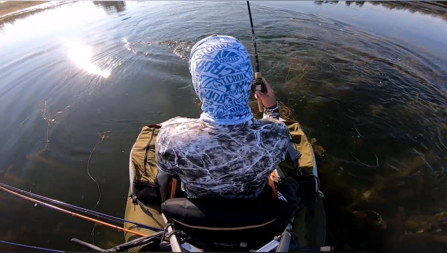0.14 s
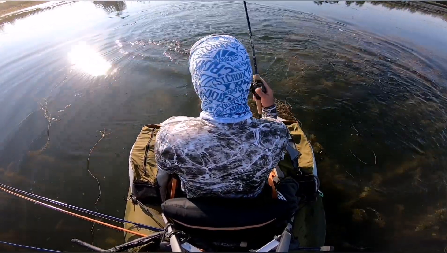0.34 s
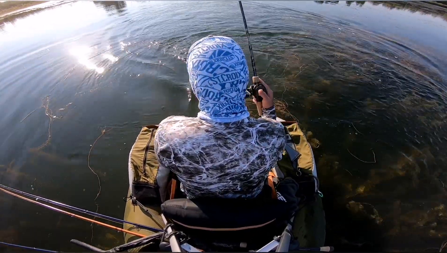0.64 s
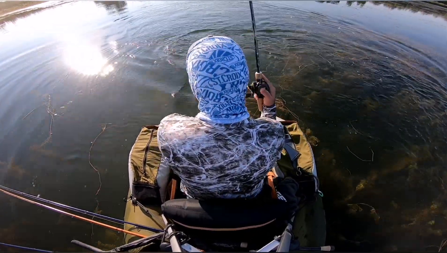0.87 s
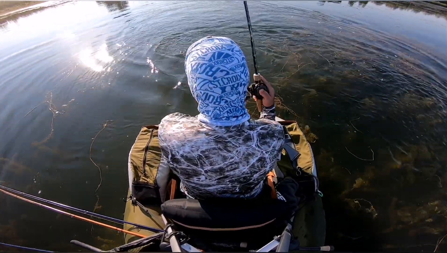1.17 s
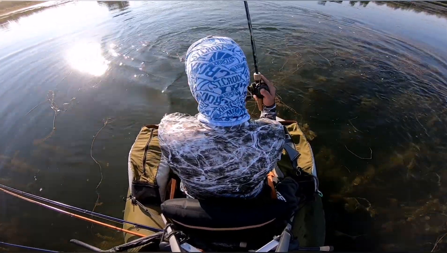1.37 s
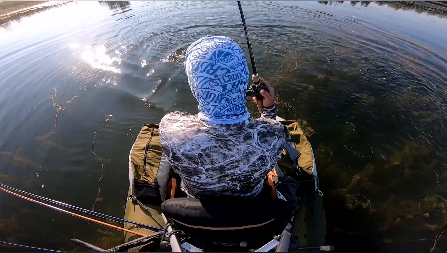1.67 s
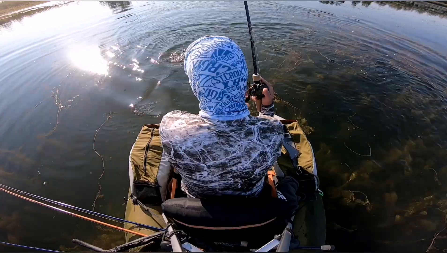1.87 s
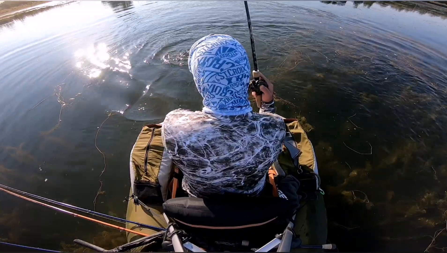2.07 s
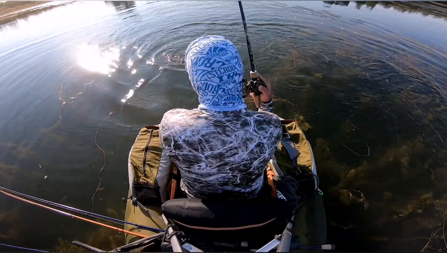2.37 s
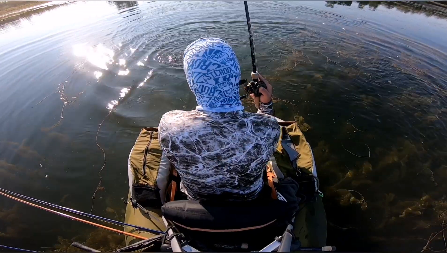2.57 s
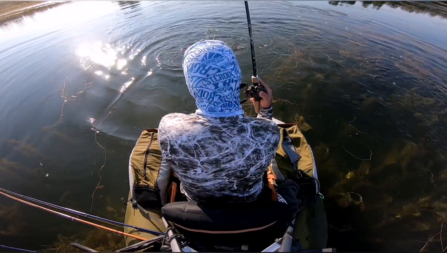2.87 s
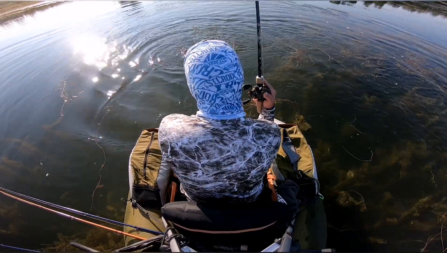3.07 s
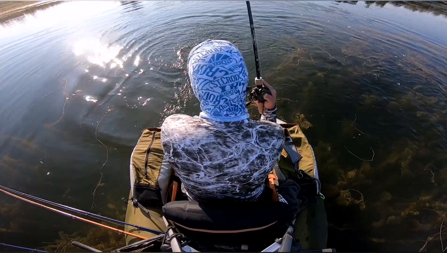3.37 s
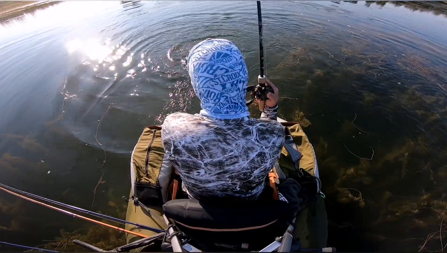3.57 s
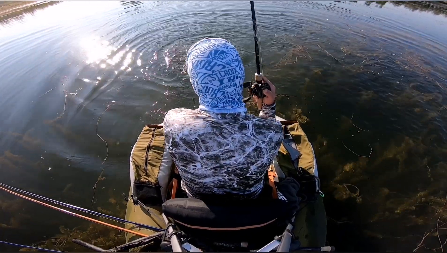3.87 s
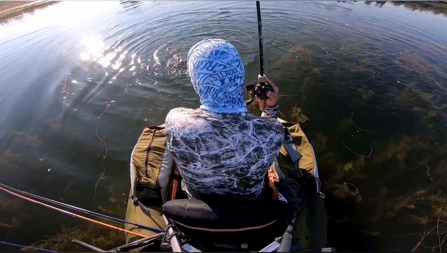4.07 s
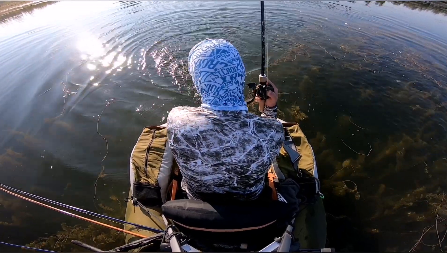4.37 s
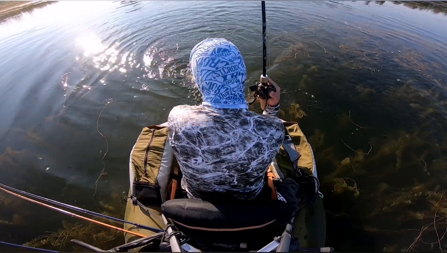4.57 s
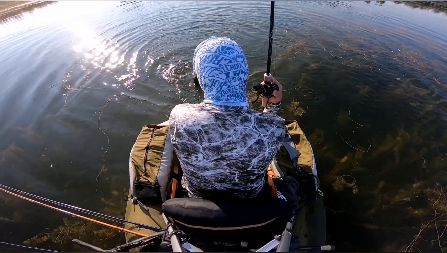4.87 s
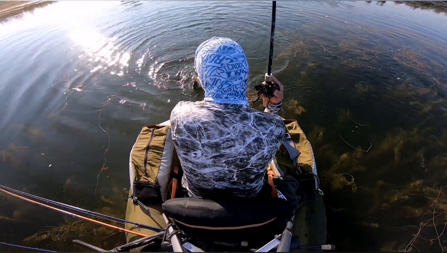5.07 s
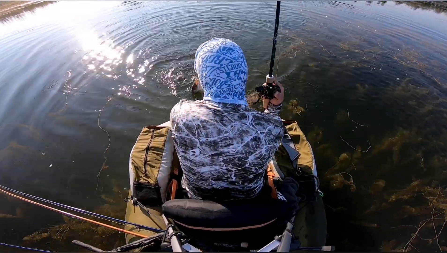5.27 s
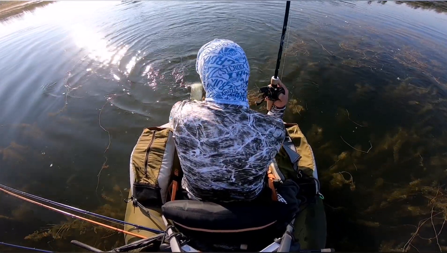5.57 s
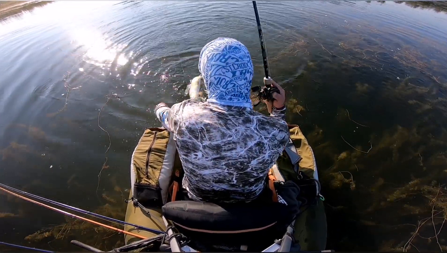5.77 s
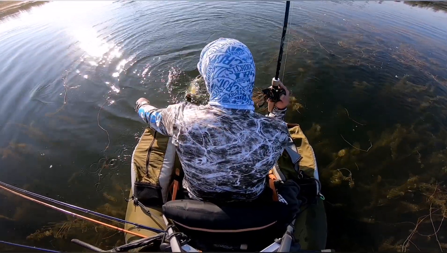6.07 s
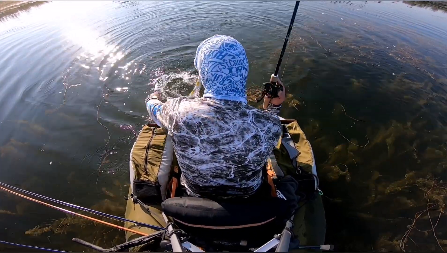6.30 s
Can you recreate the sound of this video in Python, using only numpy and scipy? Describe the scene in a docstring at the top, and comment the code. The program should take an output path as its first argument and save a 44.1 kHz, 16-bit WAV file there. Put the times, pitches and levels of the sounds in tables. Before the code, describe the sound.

Light wind rumbles and thumps on the microphone over a pond while a fish splashes beside a float tube, slightly left of centre. Short bouts of sloshing and spray follow one another, with droplets, bubbles and trickling between them. One sharp click of gear cuts in. Later the water settles for a moment, the tube gives a few soft creaks, and the fish starts thrashing again.

```python
"""A hooked fish thrashes at the surface of a pond, a little left of a float tube, while light wind buffets
two microphone ports. From the first instant water sloshes, churns and sprays; drops slap back, trapped
bubbles ring and shrinking hollows swish upward. Near 1.5 s a fitting clicks, and the bouts of thrashing
go on. In a lull at 5 s the tube's skin creaks; from 5.5 s the fish thrashes again to the end."""
import sys
import numpy as np
from scipy.fft import rfft, irfft, next_fast_len
from scipy.io import wavfile
from scipy.ndimage import uniform_filter1d, map_coordinates

SR = 44100
rng = np.random.default_rng(int(sys.argv[2]) if len(sys.argv) > 2 else 0)


def generate_wav(signal):
    """Clip the signal to [-1, 1] and save it as 16-bit WAV at the path in sys.argv[1]."""
    frames = np.transpose(np.atleast_2d(signal))
    scaled = np.clip(frames, -1, 1) * 32767
    pcm = np.round(scaled).astype(np.int16)
    wavfile.write(sys.argv[1], SR, pcm)


N = 284004

# Thrashes of the fish; rise and fall each span 20 dB of churn:
# peak_s, rise_s, fall_s, churn_db, slosh_over_churn_db, spray_over_churn_db, mist_over_spray_db
THRASHES = [ (.008, 0.047, 0.072, -41.5, -3.5, -9, -4.5), (.076, 0.11, 0.037, -48, -8, -3, -8),
            (0.109, 0.024, 0.11, -40, -14, -2.5, -1), (.35, 0.16, 0.25, -55.5, -16, -2.5, -8.5),
            (.52, 0.16, 0.11, -59, -14, -5.5, -19), (.66, 0.033, 0.18, -62.5, -16, 12, -2.5),
            (.718, 0.12, 0.023, -64, -12, 15.5, -2.5), (.85, 0.029, 0.12, -61.5, -11, 17.5, -6.5),
            (.894, 0.034, 0.016, -51, 3, 7, -10), (.95, 0.1, 0.19, -49.5, -5, -3.5, -7),
            (1.017, 0.086, 0.088, -45.5, 13, -1, -13), (1.053, 0.069, 0.052, -36.5, 0.5, -1.5, -17),
            (1.079, 0.11, 0.19, -45.5, -5.5, -1, -9.5), (1.19, 0.21, 0.25, -53.5, -5, -27, -11),
            (1.303, 0.054, 0.082, -46, -26, 4.5, -10), (1.53, 0.026, 0.15, -59, -4, 6, -5),
            (1.585, 0.061, 0.16, -43, -6.5, -2.5, -16), (1.71, 0.25, 0.15, -52, -11, 2, -30),
            (1.83, 0.099, 0.081, -56, -14.5, -21, -14), (1.92, 0.12, 0.38, -56.5, -24, -7.5, -9),
            (2.115, 0.029, 0.22, -58.5, -4, -4, 1), (2.205, 0.019, 0.063, -45.5, 0, -6.5, -10),
            (2.5, 0.023, 0.031, -56, -11, -6.5, -1.5), (2.614, 0.059, 0.14, -37, -16, -3, 0.5),
            (2.658, 0.094, 0.037, -35.5, 1.6, -11, -9), (2.735, 0.073, 0.072, -42.5, 5, -1.5, -8.5),
            (2.87, 0.14, 0.1, -49.5, -20, -4, -8), (2.971, 0.027, 0.11, -41, -5, -2.5, -0.5),
            (3.047, 0.05, 0.046, -44.5, 4, 3.5, 4), (3.064, 0.047, 0.033, -36.5, -7, 1.3, -5),
            (3.085, 0.043, 0.32, -41.5, -9.5, -11, -4), (3.15, 0.077, 0.21, -47.5, -25, -0.5, -12),
            (3.25, 0.11, 0.25, -47.5, -18, -5, -9.5), (3.297, 0.011, 0.22, -41.5, -7.5, -8.5, -4),
            (3.632, 0.67, 0.01, -55.5, -10, -6.5, -4.5), (3.777, 0.054, 0.063, -41.5, -8.5, 0, -4.5),
            (3.814, 0.043, 0.092, -48.5, -10, -5, 8.5), (3.87, 0.13, .18, -52.5, -8, -5.5, -12),
            (3.99, 0.21, 0.072, -64, -1, 6, -18), (4.062, 0.036, 0.076, -63, -6, 10.5, -11),
            (4.118, 0.03, 0.14, -41.5, -20, -12, 4), (4.144, 0.041, 0.064, -35.5, -5.5, -0.5, -6),
            (4.2, 0.14, 0.35, -48, -12, 2, -21), (4.26, 0.033, 0.069, -36.5, -4, -0.5, -12),
            (4.289, .05, 0.36, -43.5, -4, -10.5, -5), (4.4, 0.25, 0.19, -49.5, -1.5, 1, -10.5),
            (4.489, 0.08, 0.18, -42.5, -14, -16, -6), (4.57, 0.17, 0.14, -49, -30, 1, -9),
            (4.772, 0.056, 0.074, -47.5, -33, -1.5, -24), (5.556, 0.023, 0.93, -41, -13, -3, -5.5),
            (5.628, 0.076, 0.031, -38.5, 7, -6.5, 3), (5.674, 0.082, 0.055, -44.5, 12, -17, -11),
            (5.74, 0.083, 0.14, -43, 6, -23, -7), (5.918, 0.048, 0.086, -53, 5.5, -10, -6),
            (5.984, 0.077, 0.067, -46.5, 4.5, -1.5, -2), (6.127, 0.15, 0.99, -44.5, -14, -1.5, -8.5),
            (6.253, 0.25, 0.084, -45.5, -3.5, -3.5, -14), (6.351, 0.052, 0.22, -43.5, -3, -3, -4),
            (6.415, 0.15, .2, -39, 3.5, -12, -3)]
# Water running off between thrashes: time_s, level_db
TRICKLE = [(0, -61), (.8, -68.5), (1.1, -79), (1.25, -56), (1.5, -55), (2.3, -72.5), (2.6, -59.5),
           (4.7, -60.5), (4.86, -67), (5.0, -72), (5.06, -70), (5.5, -87.5), (5.6, -56), (6.44, -45)]
# Layer trims on that run-off: slosh_db, churn_db, spray_db, mist_db
TRICKLE_MIX = [-11.5, -10.5, -10, -12]
# Tone of the splashing water: frequency_hz, gain_db
WATER_EQ = [(120, -39), (200, -5.5), (446, -8.5), (525, -4), (691, 1.5), (799, -0.5), (2610, 3.5),
            (3130, 0), (7120, -9.5), (8860, -18.5), (9530, -13.5), (12500, -28.5), (15600, -24)]
# How alike the froth is left and right: frequency_hz, correlation
WATER_CORRELATION = [(290, 1), (700, 0.73), (3100, 0.95), (6800, 0.48), (15000, .3)]
# Wind rumble between gusts: time_s, level_db
BREEZE = [(0, -53), (.25, -57), (.7, -59.5), (1.05, -52), (1.17, -62), (1.5, -51), (1.75, -54), (2.05, -46),
          (2.9, -45.5), (3.4, -47.5), (3.9, -49.5), (4.15, -45.5), (4.45, -58.5), (4.7, -57), (4.9, -46),
          (5.3, -51.5), (5.9, -47), (6.44, -42)]
# Tone of the buffeting rumble: frequency_hz, gain_db
RUMBLE_EQ = [(12, -26.5), (20, -6), (54, -3), (74, -4), (152, -14.5), (195, -24), (300, -55), (390, -75.5),
             (660, -120)]
# Tone of the steady air: frequency_hz, gain_db
AIR_EQ = [(59, -33), (100, -12.5), (197, -9.5), (412, -31), (542, -31.5), (844, -25), (2700, -43.5),
          (4980, -42.5), (9190, -53), (12300, -59), (15600, -72)]
# Gusts thumping the ports: peak_s, pitch_hz, level_db, left_minus_right_db
GUSTS = [(.11, 81, -26.5, -20), (.354, 86, -30.5, -15), (.526, 64, -38, -13), (1.284, 109, -36.5, 18),
         (1.602, 77.4, -32, -8), (1.876, 70, -25, 7.5), (1.947, 79, -31, 1), (2.133, 63, -30, 7),
         (2.332, 71, -26, -12), (2.439, 77, -27, -14), (2.549, 83, -34, -14), (5.069, 75, -24, -8),
         (2.833, 68.4, -27.5, -8), (2.943, 76, -23.5, -23), (3.015, 78, -32, -15), (3.299, 67, -28.5, -15),
         (3.816, 69, -34.5, -13), (4.059, 105, -28, -8), (4.116, 111, -32, -6), (4.842, 79.4, -28.5, -9),
         (4.933, 71, -32, -12), (4.984, 92, -32.5, -12), (5.04, 80, -21.5, -13), (5.76, 60, -29.5, -6),
         (6.345, 74.3, -31, -9)]
# Drops and tail slaps: start_s, level_db, colour_hz
SLAPS = [(0.11, -21, 2150), (.3844, -41, 6000), (0.794, -38.5, 2040), (0.8919, -31, 1490),
         (1.3026, -24, 2080), (1.295, -31, 6000), (1.319, -27, 4520), (1.394, -30.5, 4160),
         (1.409, -37, 4800), (1.825, -43, 1500), (1.9011, -37, 1690), (1.9387, -35.5, 1800),
         (2.037, -43, 6300), (2.1156, -43, 3000), (2.2037, -36, 2680), (2.5634, -31, 5010),
         (2.568, -27.5, 4570), (2.615, -27, 8600), (2.7136, -33, 2890), (2.8186, -35.5, 1610),
         (2.97, -25.5, 3020), (3.042, -25, 2820), (3.052, -25, 3180), (3.1127, -38, 2550),
         (3.171, -40, 5000), (3.2966, -24.5, 1900), (3.6248, -33, 6340), (3.36, -33.5, 2600),
         (3.7604, -26.5, 2500), (3.917, -33.5, 3380), (3.734, -34, 3260), (4.05, -39.5, 2720),
         (4.0873, -27.5, 3020), (4.1357, -32, 2370), (4.2506, -31, 1930), (4.3587, -26, 2570),
         (4.413, -35, 4500), (4.4669, -33.5, 2800), (4.477, -39, 7500), (4.6913, -44, 2600),
         (4.764, -38.5, 4500), (4.783, -37, 2584), (4.895, -51, 4900), (4.8176, -30, 2230),
         (4.818, -33.5, 4950), (5.545, -34, 2000), (5.6245, -25, 3000), (5.686, -30.5, 4970),
         (5.7284, -32, 3100), (5.8861, -40, 2030), (5.9783, -31.5, 5000), (6.0357, -35, 2590),
         (6.106, -29, 3200), (6.136, -25, 1720), (6.1762, -25, 1760), (6.4182, -33, 2860)]
# Bubbles that ring clearly: start_s, pitch_hz, level_db, t60_s
BUBBLES = [(0.121, 2390, -30.5, 0.024), (.141, 1346, -34.5, 0.055), (0.164, 3400, -28.5, 0.014),
           (.204, 2110, -36.5, 0.022), (.31, 1334, -31.5, 0.043), (.422, 1310, -39, 0.024),
           (.448, 1050, -37, .042), (0.542, 2220, -37, 0.024), (.662, 2420, -40.5, .022),
           (1.363, 2850, -40.5, 0.034), (1.885, 764, -48, 0.059), (2.089, 2620, -47.5, 0.023),
           (2.129, 1820, -41, 0.019), (2.078, 1190, -44.5, 0.027), (2.258, 1530, -41.5, 0.033),
           (2.527, 1370, -39, .019), (3.271, 3770, -34.5, 0.018), (4.467, 1920, -36, 0.013),
           (4.596, 3860, -35, 0.02), (5.565, 720, -29, 0.032), (.847, 2360, -42, 0.068),
           (.892, 1400, -29, 0.015), (.933, 1290, -27, 0.012), (0.97, 366, -37, 0.26),
           (1.011, 506, -26, 0.024), (1.04, 1228, -26, 0.077), (1.086, 2060, -33, .02),
           (1.118, 2264, -34.5, 0.02), (1.18, 1220, -36.5, 0.098), (1.203, 1530, -28.5, 0.021),
           (1.322, 1330, -39.5, 0.076), (1.553, 2490, -38, 0.066), (1.586, 1870, -35, 0.031),
           (1.645, 1096, -34.5, 0.041), (2.04, 2300, -36.5, 0.016), (2.218, 1330, -24.5, 0.016),
           (2.541, 1135, -35.5, 0.03), (2.606, 1376, -34, 0.081), (2.616, 8530, -27.5, 0.017),
           (2.623, 4770, -31.5, .046), (2.658, 1900, -23.5, 0.017), (2.771, 2640, -35.5, 0.021),
           (2.778, 1014, -31, 0.036), (2.961, 4840, -32, 0.039), (2.973, 8440, -35.5, 0.019),
           (2.988, 1170, -36.5, 0.11), (3.008, 1490, -28, 0.019), (3.017, 2820, -33.5, 0.042),
           (3.036, 1400, -24.5, 0.015), (3.04, 407, -17.5, 0.022), (3.063, 3070, -18.5, 0.025),
           (3.159, 3000, -31, 0.028), (3.26, 710, -39, 0.099), (3.297, 995, -22.5, 0.03),
           (3.594, 1575, -31.5, 0.033), (3.626, 1116, -37.5, 0.058), (3.698, 1440, -34.5, 0.025),
           (3.77, 2530, -30, 0.04), (3.775, 1200, -24.5, 0.02), (3.792, 1050, -30.5, .027),
           (3.857, 1560, -27.5, 0.026), (3.918, 1420, -43, 0.045), (4.087, 1650, -25, 0.015),
           (4.088, 3400, -29, 0.011), (4.126, 1660, -28, .019), (4.149, 5180, -33, .025),
           (4.149, 1370, -24.5, 0.027), (4.163, 1420, -28, 0.028), (4.21, 1970, -26.5, 0.02),
           (4.228, 2110, -29, 0.043), (4.249, 5830, -27.5, 0.012), (4.253, 1570, -32, .027),
           (4.441, 2620, -22, 0.016), (4.495, 2800, -32, 0.014), (4.554, 1560, -25, 0.017),
           (4.58, 2380, -36, .02), (4.714, 1100, -45, 0.047), (4.748, 1410, -39, .03),
           (4.819, 1690, -35, 0.018), (5.56, 1280, -19, 0.016), (5.571, 2100, -29, .015),
           (5.612, 2130, -27, 0.016), (5.622, 699, -23, 0.055), (5.623, 4370, -28.5, 0.017),
           (5.642, 935, -22, 0.035), (5.668, 652, -20.5, 0.037), (6.129, 1650, -25, 0.014),
           (5.961, 1230, -23.5, 0.014), (5.978, 590, -31.5, 0.051), (6.108, 1900, -24, 0.018),
           (6.137, 1800, -21.5, 0.019), (6.155, 1710, -23, 0.014), (6.179, 2830, -27.5, 0.021),
           (6.226, 715, -29.5, 0.064), (6.25, 743, -35, 0.12), (6.35, 428, -31.5, 0.074),
           (6.417, 1024, -20, 0.037)]
# Shrinking hollows of water: start_s, length_s, from_hz, to_hz, level_db, roughness (0-1)
SWISHES = [(0.652, .055, 2300, 4900, -47, 0.68), (0.846, .045, 2092, 5300, -48, 0.66),
           (4.355, .025, 1200, 1300, -43.5, .3), (4.41, 0.031, 550, 726, -49.5, .2),
           (3.798, 0.046, 561, 700, -47.5, 0.26), (6.009, 0.084, 454, 885, -48.5, 0.5),
           (2.965, 0.068, 380, 624, -44.5, 0.48), (3.098, 0.048, 500, 610, -49, 0.4),
           (3, 0.06, 301, 465, -53.5, 0.3), (3.412, 0.0487, 483, 516, -53.5, 0.2),
           (4.26, 0.071, 300, 390, -44, 0.3), (5.782, 0.057, 380, 420, -46, 0.1),
           (3.921, .011, 2300, 3800, -40, 0.25), (5.673, 0.042, 397, 435, -44.5, 0.6),
           (5.887, .04, 850, 1540, -48, 0.34), (6.302, 0.0293, 1350, 2200, -44, 0.2),
           (6.257, .035, 754, 920, -40.5, 0.2), (6.375, 0.024, 520, 810, -45, 0.5)]
# The fitting's snap and bounces: start_s, level_db
CLICK_CONTACTS = [(1.4693, -9), (1.4704, -11), (1.4724, -21), (1.4746, -18), (1.4785, -29)]
# Its ringing modes: pitch_hz, gain_db, t60_s
CLICK_MODES = [(1770, 4, .008), (2520, 0, .01), (2830, 0, .01), (4250, 7, .0055), (5000, -5, .008),
               (7400, -2, .004), (8800, -8, .004), (10300, -6, .003)]
# Slips of the tube's skin: start_s, level_db, thump_offset_db
SKIN_SLIPS = [(5.037, -35, 0.5), (5.073, -39.5, 5.5), (5.131, -42, 6), (5.142, -46, -4),
              (5.173, -48.5, 11.5), (5.229, -52.5, 11.5), (5.259, -46.5, -1), (5.399, -53, 4),
              (5.485, -48, -2), (5.495, -42.5, 10)]
# Resonances of the skin: centre_hz, width_hz, gain_db
SKIN_RESONANCES = [(580, 450, -12), (1170, 420, -4.5), (2050, 1060, -13.5), (4400, 2650, -28)]
# Modes of the air in the tube: pitch_hz, gain_db, t60_s
TUBE_AIR_MODES = [(249, 5.5, 0.043), (368, -4.5, 0.048)]
# Phase of the left port ahead of the right: frequency_hz, lead_rad
LEFT_PORT_LEAD = [(3000, 0), (5250, .5), (8700, .2), (9700, .5), (12200, 1.9), (14100, 0)]
# Top end of the microphone capsules: frequency_hz, gain_db
CAPSULE_EQ = [(11000, 0), (12500, 1.5), (15000, -9.5), (15700, -23)]


def amp(db):
    return 10 ** (np.asarray(db) / 20)


def unit_rms(x):
    return x / np.sqrt(np.mean(x ** 2) + 1e-20)


def along(points, hz):
    """Read (frequency_hz, value) points on a log axis."""
    f, values = np.transpose(points)
    return np.interp(np.log(hz + 1), np.log(f + 1), values)


def automation(points):
    """Draw (time_s, value) points out to one value a sample."""
    return np.interp(np.arange(N) / SR, *np.transpose(points))


def wobble(rate_hz):
    """A smooth random curve through rate_hz knots a second."""
    knots = rng.standard_normal(int(N * rate_hz / SR) + 4)
    return map_coordinates(knots, [np.arange(N) * rate_hz / SR])


def filtered(x, response):
    """Shape x with a complex frequency response."""
    size = next_fast_len(N + SR // 2)
    return irfft(rfft(x, size) * response(np.fft.rfftfreq(size, 1 / SR)), size)[..., :N]


def resonance(f, hz, width_hz):
    return 1j * f * width_hz / (hz * hz - f * f + 1j * f * width_hz)


def lay(start_s, waves):
    """Mix each row of waves onto the timeline at its start."""
    at = np.round(np.asarray(start_s) * SR).astype(int)[:, None] + np.arange(waves.shape[1])
    return np.bincount(at.ravel(), waves.ravel(), N + SR)[:N]


def rings(start_s, hz, db, t60_s, samples, glide=0):
    """Damped sines; glide bends them upward, like a bubble nearing the surface."""
    start_s, *columns = np.broadcast_arrays(start_s, hz, db, t60_s, glide)
    hz, db, t60_s, glide = (column[:, None] for column in columns)
    t = np.arange(samples) / SR
    phase = 2 * np.pi * hz * t * (1 + 2.49 * glide * np.minimum(t / t60_s, 1))
    attack = 1 - np.exp(-t * hz / 0.87)
    return lay(start_s, amp(db - 60 * t / t60_s) * attack * np.sin(phase))


def swells(peak_s, rise_s, fall_s, db, bed_db):
    """A gain curve: peaks that climb 20 dB in rise_s and drop 20 dB in fall_s, over a bed."""
    peak_s, rise_s, fall_s, db = (np.reshape(v, (-1, 1)) for v in (peak_s, rise_s, fall_s, db))
    t = np.arange(0, N, 32) / SR
    away = np.where(t < peak_s, (peak_s - t) / rise_s, (t - peak_s) / fall_s)
    power = np.sum(amp(db - 20 * away) ** 2, axis=0)
    return np.sqrt(np.interp(np.arange(N) / SR, t, power) + amp(bed_db) ** 2)


def levelled(x, window_s, amount):
    """Ride out chance swells (amount 0-1) and return at rms 1."""
    window = int(window_s * SR)
    power = uniform_filter1d(uniform_filter1d(x ** 2, window), window)
    return unit_rms(x / (abs(power) + 1e-12) ** (amount / 2))


def froth(low_hz, high_hz, lumps, cycles, spread_db, bubble_share, count, samples):
    """One stereo band of water: a cloud of short bubbles over lumpy noise."""
    when, pitch, life, rank = rng.random((count, 4)).T
    hz = low_hz * (high_hz / low_hz) ** pitch
    db = -spread_db * np.log(rank + .02)  # a few loud, many faint
    cloud = unit_rms(rings(when * N / SR, hz, db, cycles * (.5 + life) / hz, samples, glide=.2 * life))
    wash = unit_rms(lumps * rng.standard_normal(N))
    mid = np.sqrt(bubble_share) * cloud + np.sqrt(1 - bubble_share) * wash
    side = unit_rms(lumps * rng.standard_normal(N))
    skirts = lambda f: np.sqrt((1 + (low_hz / (f + 1)) ** 6) * (1 + (f / high_hz) ** 6))
    band = lambda f: amp(along(WATER_EQ, f)) / skirts(f)
    width = lambda f: np.arccos(along(WATER_CORRELATION, f)) / 2
    mid = filtered(unit_rms(filtered(mid, band)), lambda f: np.cos(width(f)))
    side = filtered(unit_rms(filtered(side, band)), lambda f: np.sin(width(f)))
    return np.array([mid + side, mid - side])


def splash():
    """Large pockets slosh low, small bubbles churn, spray and mist crackle on top, all jolted together."""
    peak_s, rise_s, fall_s, churn_db, slosh_over, spray_over, mist_over = np.transpose(THRASHES)
    spray_db = churn_db + spray_over
    levels_db = [churn_db + slosh_over, churn_db, spray_db, spray_db + mist_over]
    paces = [1.55, 1, 1.276, 1.77]  # how fast each layer comes and goes, against the churn
    gains = [swells(peak_s, rise_s / pace, fall_s / pace, db, automation(TRICKLE) + trim_db)
             for db, pace, trim_db in zip(levels_db, paces, TRICKLE_MIX)]
    jolts = wobble(40) + wobble(180)
    lumps = lambda shared_db, own_db: amp(shared_db * jolts + own_db * wobble(90))
    slosh = froth(220, 800, lumps(1.5, 1.3),
                  cycles=8, spread_db=3, bubble_share=.25, count=900, samples=2000)
    churn = froth(800, 3000, lumps(1.4, 1.5),
                  cycles=16, spread_db=3.5, bubble_share=.38, count=2600, samples=1100)
    spray = froth(2920, 7570, lumps(1.8, 2.1),
                  cycles=20, spread_db=4.5, bubble_share=.3, count=3500, samples=320)
    mist = froth(7480, 17000, lumps(1.4, 1.8),
                 cycles=16, spread_db=4, bubble_share=.2, count=10000, samples=160)
    slosh = levelled(slosh, window_s=0.047, amount=1)
    return sum(gain * layer for gain, layer in zip(gains, [slosh, churn, spray, mist]))


def wind():
    """Buffeting rumble, mostly separate at each port, surges around each thump over steady air."""
    peak_s, _, db, pan_db = np.transpose(GUSTS)
    surge_s, surge_db, air_db = 0.12, -9, -56.5
    right_db = db + surge_db - 10 * np.log10((1 + amp(pan_db) ** 2) / 2)
    bed_db = automation(BREEZE)
    surges = np.array([swells(peak_s, surge_s, surge_s, right_db + pan_db, bed_db - 2),
                       swells(peak_s, surge_s, surge_s, right_db, bed_db + 2)])
    left, right, shared, mid, side = rng.standard_normal((5, N))
    lumps = amp(1.8 * np.array([wobble(24), wobble(24)]))
    buffeting = lumps * np.array([left + 0.75 * shared, right + 0.87 * shared])
    rumble = filtered(buffeting, lambda f: amp(along(RUMBLE_EQ, f)))
    rumble = levelled(rumble, window_s=0.072, amount=0.38)
    air = filtered(np.array([mid + side, mid - 0.87 * side]), lambda f: amp(along(AIR_EQ, f)))
    return surges * rumble + gust_thumps() + amp(air_db) * unit_rms(air)


def gust_thumps():
    """Each gust is a cycle or two of bass pressure, with its own phase at each port."""
    peak_s, hz, db, pan_db = np.transpose(GUSTS)[..., None]
    t = np.arange(-2000, 2000) / SR
    spread_cycles = 0.46
    phases = 2 * np.pi * rng.random((len(peak_s), 2))
    bell = amp(db) * np.exp(-.5 * (t * hz / spread_cycles) ** 2) * np.sqrt(2 / (1 + amp(pan_db) ** 2))
    left = amp(pan_db) * bell * np.cos(2 * np.pi * hz * t + phases[:, :1])
    right = bell * np.cos(2 * np.pi * hz * t + phases[:, 1:])
    return np.array([lay(peak_s[:, 0] + t[0], port) for port in (left, right)])


def slaps():
    """A drop or the tail hits the water: a snap and a few milliseconds of coloured noise."""
    start_s, db, colour_hz = np.transpose(SLAPS)
    t, f = np.arange(1024) / SR, np.fft.rfftfreq(1024, 1 / SR)
    snap = 2.85 * (t == 0)
    bursts = amp(-60 * t / 0.012) * rng.standard_normal((len(start_s), len(t))) + snap
    colour = resonance(f, colour_hz[:, None], 0.73 * colour_hz[:, None]) ** 2 / (1 + 1j * f / 12000)
    bursts = irfft(rfft(bursts) * colour)
    return lay(start_s, amp(db - 1)[:, None] * bursts / abs(bursts).max(axis=1, keepdims=True))


def bubbles():
    """Single trapped bubbles ring unevenly above the froth, each opened by the tick of its drop."""
    start_s, hz, db, t60_s = np.transpose(BUBBLES)
    flutter = amp(1.5 * wobble(250))
    notes = rings(start_s, hz, db, t60_s, samples=5000, glide=0.047)
    return notes * flutter + drop_ticks(start_s, db - 13.5)


def drop_ticks(start_s, db):
    """Droplets land as thin, bright ticks."""
    t = np.arange(200) / SR
    hits = amp(db[:, None] - 60 * t / 0.0048) * rng.standard_normal((len(start_s), len(t)))
    return filtered(lay(start_s, hits), lambda f: resonance(f, 3300, 3500) / (1 + 1j * f / 7000))


def swishes():
    """A hollow of water shrinks, so its note climbs; roughness smears it into narrow noise."""
    out = np.zeros(N)
    for start_s, length_s, from_hz, to_hz, db, rough in SWISHES:
        samples = int(length_s * SR)
        progress = np.arange(samples) / samples
        hz = from_hz * (to_hz / from_hz) ** progress ** .7  # fast at first, then easing
        phase = 2 * np.pi * np.cumsum(hz) / SR
        smear_hz = (.15 + .4 * rough) * from_hz
        noise = uniform_filter1d(rng.standard_normal((2, 8000)), int(SR / smear_hz), axis=1)
        sin_noise, cos_noise = unit_rms(noise)[:, :samples]
        note = (1 - rough + rough * sin_noise) * np.sin(phase) + rough * cos_noise * np.cos(phase)
        envelope = amp(db - 3.1 * progress) * np.sin(np.pi * progress) ** 0.22
        out[round(start_s * SR):][:samples] += envelope * unit_rms(note)
    return out


def click():
    """A fitting snaps and bounces: each contact cracks and rings the same modes, weak ones duller."""
    hz, mode_db, t60_s = np.transpose(CLICK_MODES)
    start_s, db = np.transpose(CLICK_CONTACTS)
    t = np.arange(400) / SR
    cracks = amp(1.5 * db[:, None] - 3 - 60 * t / .007) * rng.standard_normal((len(start_s), len(t)))
    out = lay(start_s, cracks)
    treble_octaves = np.log2(hz / 2600).clip(0)
    for contact_s, contact_db in CLICK_CONTACTS:
        dulling_db = 0.5 * (contact_db - db.max()) * treble_octaves
        ring_db = contact_db - 6 + mode_db + dulling_db + rng.normal(0, 1.22, len(hz))
        out += rings(contact_s, hz, ring_db, t60_s, samples=1200)
    return filtered(out, lambda f: (1j * f / (1100 + 1j * f)) ** 2 / (1 + (f / 13000) ** 8))


def tube_creak():
    """The tube's skin slips in short scuffs that also thump the air inside."""
    start_s, db, thump_db = np.transpose(SKIN_SLIPS)
    t = np.arange(500) / SR
    scuffs = amp(db[:, None] + 17 - 60 * t / 0.025) * rng.standard_normal((len(start_s), len(t)))
    thumps = sum(rings(start_s, hz, db + thump_db + mode_db, t60_s, samples=3000)
                 for hz, mode_db, t60_s in TUBE_AIR_MODES)
    skin = lambda f: sum((-1) ** k * amp(gain_db) * resonance(f, hz, width_hz)
                         for k, (hz, width_hz, gain_db) in enumerate(SKIN_RESONANCES))
    return thumps + filtered(lay(start_s, scuffs), skin)


def scene():
    """The mix: water a little left, click and creak a little right, wind on both sides."""
    water = (splash() + bubbles() + slaps() + swishes()) * amp([[1.5], [-1.7]])
    gear = click() * amp([[-.8], [.8]]) + tube_creak() * amp([[-1.6], [1.4]])
    return water + gear + wind()


def record(dry):
    """The right port's cavity rings in the treble, the left dips; phases part and the top is cut."""
    top_hz = 15740
    ports = lambda f: np.array([1 - 0.68 * resonance(f, 9490, 1620), 1 + 2 * resonance(f, 8680, 610)])
    lead = lambda f: np.exp(.5j * np.outer([1, -1], along(LEFT_PORT_LEAD, f)))
    heard = filtered(dry, lambda f: ports(f) * lead(f) * amp(along(CAPSULE_EQ, f)))
    return filtered(heard, lambda f: f < top_hz)


dry = scene()
out = record(dry)
generate_wav(out)
```